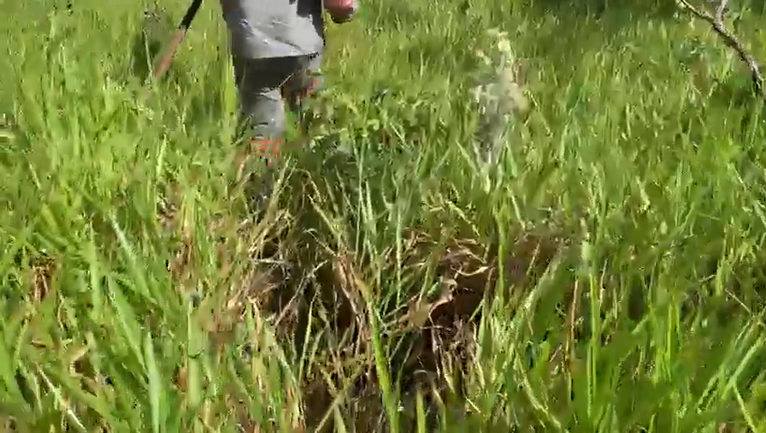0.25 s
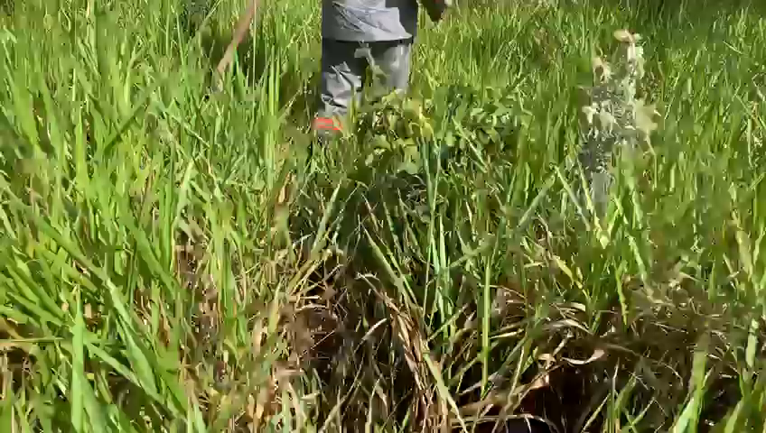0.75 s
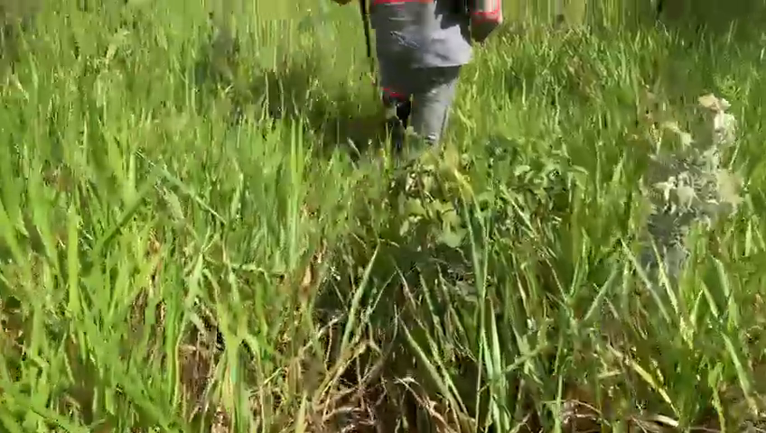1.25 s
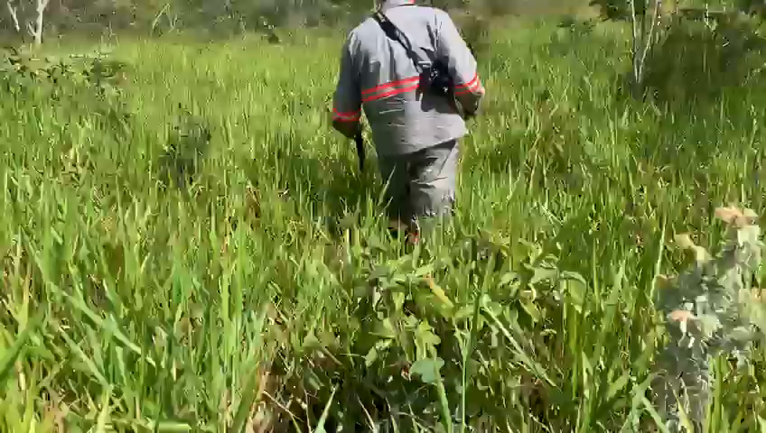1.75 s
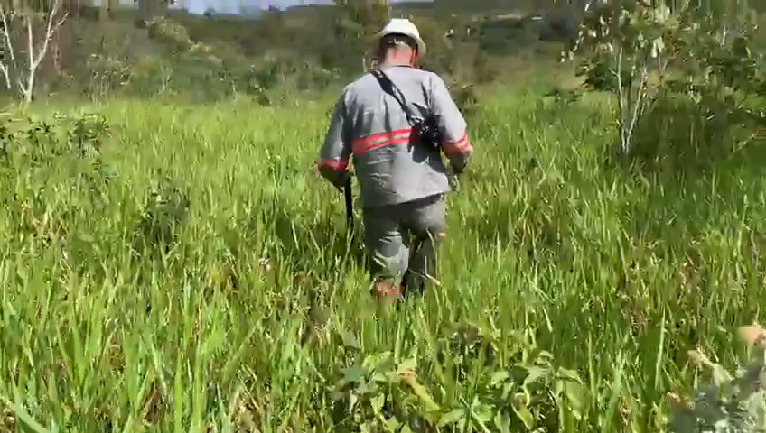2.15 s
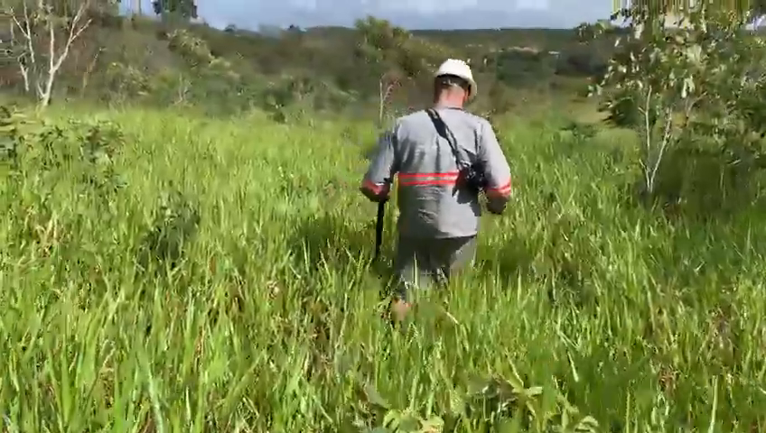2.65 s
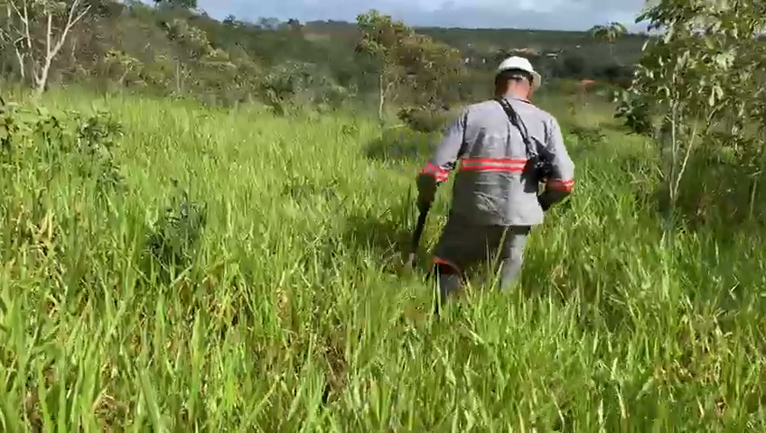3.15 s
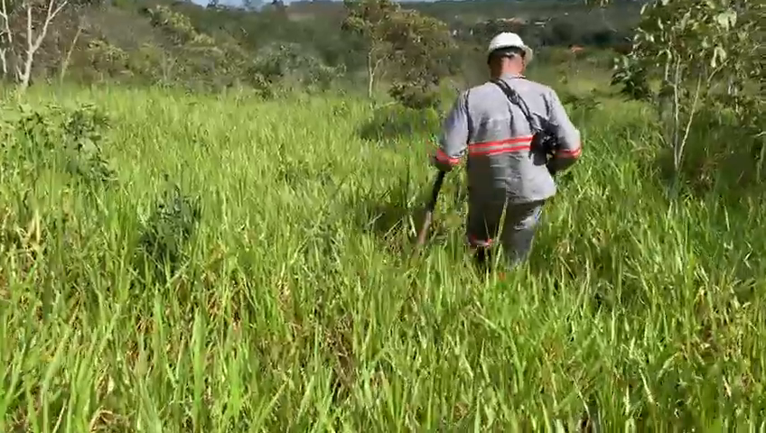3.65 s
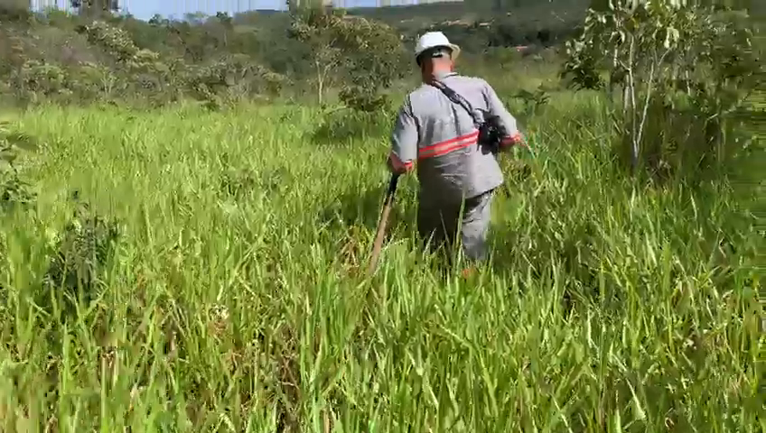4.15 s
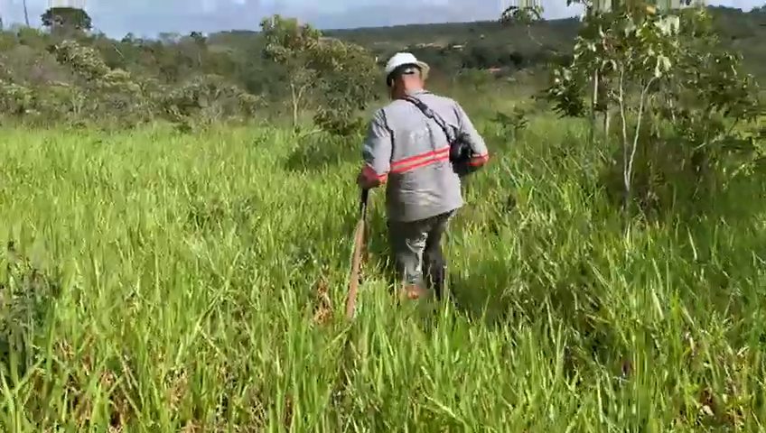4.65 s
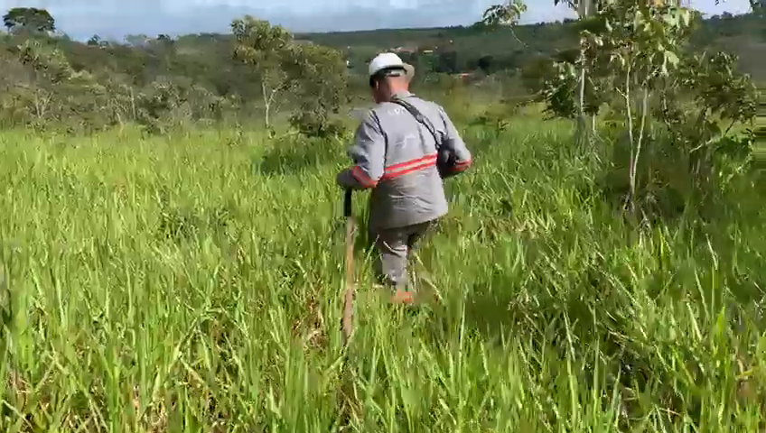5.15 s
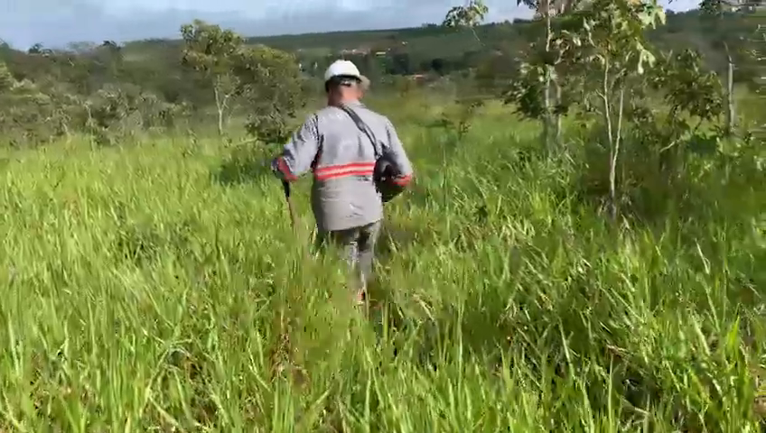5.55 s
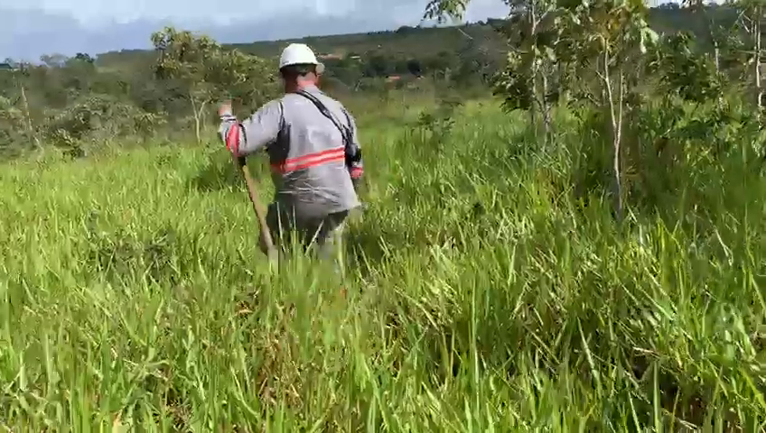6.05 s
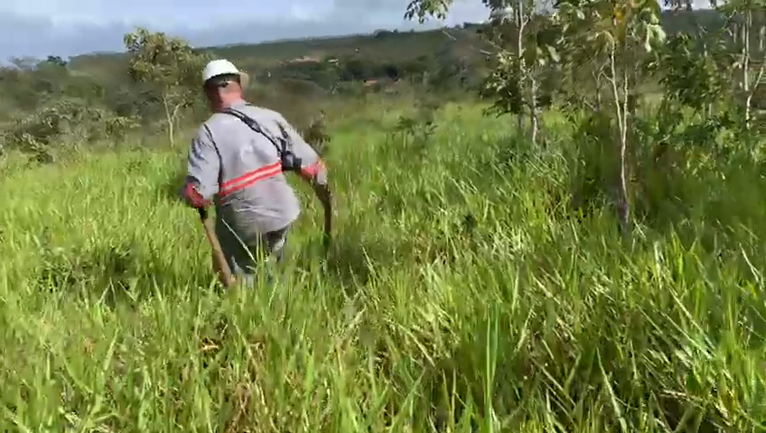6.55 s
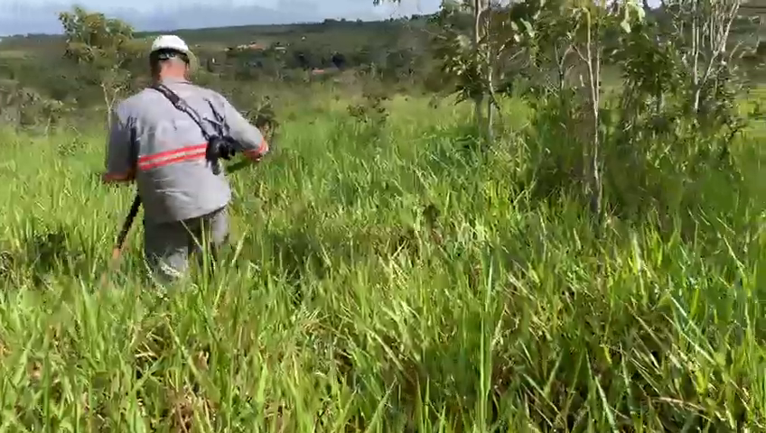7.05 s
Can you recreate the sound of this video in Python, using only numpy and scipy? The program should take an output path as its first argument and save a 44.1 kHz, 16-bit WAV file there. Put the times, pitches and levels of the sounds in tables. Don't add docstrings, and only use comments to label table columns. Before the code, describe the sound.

Close, uneven rasping of grass blades on cloth, dull boot tramples, dry cracks and woody snaps, over soft lumpy wind buffeting outdoors.

```python
import sys
import numpy as np
from scipy import signal
from scipy.fft import rfft, irfft
from scipy.io import wavfile
from scipy.ndimage import uniform_filter1d

SR = 44100
rng = np.random.default_rng(int(sys.argv[2]) if len(sys.argv) > 2 else 0)


def to_wav(s):
    ch = np.atleast_2d(s).T
    pcm = np.round(np.clip(ch, -1, 1) * 32767)
    wavfile.write(sys.argv[1], SR, pcm.astype(np.int16))


def gain_from_decibels(decibels):
    exponent = np.asarray(decibels, float) / 20
    return 10 ** exponent


N = 321930

# pitch_hz [Hz], level_db [dB per Hz]
STEM_COLOUR = [(120, 2), (200, -8.5), (350, -7.5), (650, -13.5), (800, -12), (1050, -8.5), (1400, -9.5),
               (2000, -8.5), (3500, -5), (5800, -0.5)]
# start_s [s], trample_db [dB], crunch_db [dB]
BOOT_LANDINGS = [(.38, -51, -63), (1.05, -53.5, -71), (1.25, -52.5, -49), (1.42, -57, -61),
                 (1.98, -69, -53.5), (2.13, -77, -54), (2.5, -55, -50.5), (3.25, -63, -52.5),
                 (3.9, -65, -69), (4.42, -69, -50.5), (4.7, -74, -59), (4.829, -50.5, -57),
                 (4.94, -53, -50.5), (5.27, -52.5, -42.5), (5.85, -52.5, -50), (6.21, -71, -49.5),
                 (6.361, -53, -50.5), (6.82, -53, -49)]


def curve(hz, table, column=1):
    rows = np.array(table)
    return np.interp(np.log(hz + 1), np.log(rows[:, 0]), rows[:, column])


def colour(x, table, lo_hz, hi_hz):
    hz = np.fft.rfftfreq(N, 1 / SR) + 1
    edges = 1 / np.sqrt((1 + (lo_hz / hz) ** 8) * (1 + (hz / hi_hz) ** 8))
    y = irfft(rfft(x) * gain_from_decibels(curve(hz, table)) * edges, N)
    return y / np.std(y)


def walk(rate_hz):
    hold = int(SR / rate_hz)
    held = np.repeat(rng.standard_normal(N // 200), hold)[:N]
    return 1.7 * uniform_filter1d(uniform_filter1d(held, hold), hold)


def swells(under_db, rows):
    ms = np.arange(N * 1000 // SR + 2)
    power = 0
    for peak_s, peak_db, rise_ms, fade_ms in rows:
        late_ms = ms - 1000 * peak_s
        tens_down = np.where(late_ms < 0, -late_ms / max(rise_ms, 10), late_ms / max(fade_ms, 10))
        power = power + gain_from_decibels(2 * peak_db - 20 * tens_down)
    return 10 * np.log10(gain_from_decibels(2 * under_db) + np.interp(np.arange(N) * 1000 / SR, ms, power))


def ports(pair):
    body = [(80, .87, .1, -.4), (300, .75, -.1, -2.3), (450, .7, -.6, -2.3), (590, .55, -1.6, 0),
            (660, .65, -2.5, 2.5), (720, .5, -1.3, 4.5), (800, .55, -.5, 6.0), (1000, .78, -.4, 2.2),
            (2000, .55, -.45, 1.0), (2300, .3, -2.0, .7), (3000, .58, -2.9, .3), (4200, .05, -3.0, .1),
            (5400, .45, -3.1, -3.0), (5850, .05, -1.5, -3.7), (6400, .8, .05, -.8), (8000, .96, .05, .05)]
    path_from_hz, path_to_hz, path_s = 6130, 10900, .000213
    hz = np.fft.rfftfreq(N, 1 / SR)
    alike = np.clip(curve(hz, body), 0, 1)
    path_hz = np.clip(hz, path_from_hz, path_to_hz) - path_from_hz
    lead = curve(hz, body, column=2) + 2 * np.pi * path_s * path_hz
    tilt = gain_from_decibels(curve(hz, body, column=3) / 2)
    a, b = rfft(pair)
    right = alike * np.exp(1j * lead) * a + np.sqrt(1 - alike ** 2) * b
    return irfft([a * tilt, right / tilt], N)


def widen(x, width_db):
    mid = (x[0] + x[1]) / 2
    side = (x[0] - x[1]) / 2 * gain_from_decibels(width_db)
    return np.array([mid + side, mid - side])


def ticks(spread_db, tail_s, hush_db, flicker_db):
    slips_per_s = 1500
    slips = (rng.random(N) < slips_per_s / SR) * gain_from_decibels(2 * spread_db * rng.exponential(size=N))
    power = signal.lfilter([1], [1, -np.exp(-1 / (tail_s * SR))], slips)
    puff = np.sqrt(power / power.mean() + gain_from_decibels(2 * hush_db)) * gain_from_decibels(flicker_db * walk(25))
    return puff * rng.standard_normal((2, N))


def leg_swings():
    swishes = [(.01, -33, 237, 161), (.25, -37.5, 82, 410), (.38, -27, 210, 202), (0.548, -29, 448, 307),
               (1.09, -38.5, 704, 37), (1.218, -25.5, 107, 306), (1.41, -32.5, 69, 150),
               (1.63, -31, 132, 126), (2.0, -33, 234, 218), (2.409, -31, 205, 672), (2.59, -37.5, 580, 81),
               (2.842, -32, 3, 109.5), (3.3, -35, 299, 189), (3.7, -36.5, 332, 203), (3.8, -38, 35, 850),
               (4.04, -42, 63, 48), (4.16, -35.5, 114, 187), (4.579, -35, 252, 62), (4.9, -32, 91, 144),
               (5.14, -34.5, 780, 134), (5.41, -41, 98, 200), (5.81, -29.5, 116, 428), (6.23, -32, 776, 85),
               (6.601, -39.5, 196, 153), (6.771, -31.5, 65, 754), (6.88, -31.5, 239, 40),
               (.12, -45, 100, 100), (7.06, -33, 236, 600)]
    return swells(-47, swishes) - 4


def follow(hiss_db, below_db, lag):
    return hiss_db + below_db - lag * (hiss_db + 40)


def boot_swells(under_db, column):
    rise_ms, fade_ms = 130, 60
    return swells(under_db, [(b[0], b[column], rise_ms, fade_ms) for b in BOOT_LANDINGS])


def blade_tips(hiss_db):
    tip_colour = [(5000, -8), (6200, -7.5), (6900, -3.5), (7700, -2), (8500, 0), (10800, 0), (11500, -2.5),
                  (11800, -8), (12000, -16)]
    return ports(colour(ticks(1.9, 0.0024, 2.2, 0.97), tip_colour, 5700, 14000) * gain_from_decibels(hiss_db + 3.5))


def blade_rasp(hiss_db, rasp_wide_db, sheen_wide_db):
    slips = ticks(2.5, 0.004, 1.4, 1.3)
    level_db = follow(hiss_db, -9, 0.17)
    rasp_db = level_db - 0.59 * rasp_wide_db - 2.5
    sheen_db = level_db - 0.53 * sheen_wide_db - 0.82
    rasp = colour(slips, STEM_COLOUR, 2300, 3600) * gain_from_decibels(rasp_db)
    sheen = colour(slips, STEM_COLOUR, 3600, 5700) * gain_from_decibels(sheen_db)
    return widen(ports(rasp), rasp_wide_db) + widen(ports(sheen), sheen_wide_db)


def stem_crunch(hiss_db, wide_db):
    level_db = boot_swells(follow(hiss_db, -12, 0.34), column=2) - 0.25 * wide_db + 1.0
    crunch = colour(ticks(2.76, 0.0042, 0.86, 0.92), STEM_COLOUR, 750, 2450) * gain_from_decibels(level_db)
    return widen(ports(crunch), wide_db)


def trample(hiss_db):
    level_db = boot_swells(follow(hiss_db, -17.5, 0.6), column=1) + 2.5
    return ports(colour(ticks(2.9, 0.0071, 3.1, 0.93), STEM_COLOUR, 148, 773) * gain_from_decibels(level_db))


def grass():
    phone_turn = [(0.03, 4.5, 13.5, -4.5), (0.15, 3.5, 11, -2.5), (0.25, 2.5, 4, 3), (0.35, 0, 5.5, 9),
                  (0.45, 9.5, 10.5, -5.5), (0.56, 2.5, 11, -2.5), (0.75, 4, 9.5, -4), (0.82, -2, -9, 7),
                  (0.97, 3, 0, 2), (1.1, -6.5, 2.5, 2), (1.3, -0.5, -2.5, 2.5), (1.6, -6.5, -10.5, 1),
                  (1.8, -0.5, -3.5, 6.5), (1.95, -2, 8, 1.5), (2.12, -3.5, 1.5, 5), (2.35, -4.5, -7.5, 2),
                  (2.55, 4, -7.5, 0.5), (2.73, 3.5, -2.5, 4.5), (2.9, 9, 6, -2.5), (3.1, -0.5, -3.5, 1.5),
                  (3.5, -2.5, -3.0, 0.5), (3.9, -1.5, -7, -2.5), (4.15, -4.5, -2, -1),
                  (4.47, 0.5, -2.5, 3.5), (4.75, -2, -4, -3), (5.0, 2.5, 4, -7.5), (5.25, -5, -7.5, 0.5),
                  (5.4, -6.5, -4, -4), (5.55, 1.5, 8, -1), (5.75, 0, -3, 2.5), (5.93, -2.5, 3.5, 4),
                  (6.15, 0.5, 1.5, 3.5), (6.35, 4, 8.5, -9), (6.53, 4.5, 8, -2.5), (6.66, 1, 0.5, -7.5),
                  (6.83, 4.5, 10.5, 1.5), (7.0, 1, -1, -4.5), (7.15, -3, 2.5, 0), (7.25, 4, 9, -2.5)]
    start_s, *widths = np.transpose(phone_turn)
    t = np.arange(N) / SR
    crunch_wide_db, rasp_wide_db, sheen_wide_db = (np.interp(t, start_s, w) for w in widths)
    hiss_db = leg_swings()
    fine = blade_tips(hiss_db) + blade_rasp(hiss_db, rasp_wide_db, sheen_wide_db)
    return fine + stem_crunch(hiss_db, crunch_wide_db) + trample(hiss_db)


def wind():
    # start_s [s], level_db [dB]
    breeze = [
        (0, -48),
        (.5, -45),
        (1.2, -48.5),
        (2.4, -53),
        (3.2, -52.5),
        (5.6, -52),
        (6.5, -45.5),
        (7.3, -54),
    ]
    # start_s (peak) [s], level_db [dB]
    puffs = [(.04, -42), (.32, -41), (.53, -40.5), (.93, -40.5), (1.3, -49), (1.83, -45), (2.01, -45.5),
             (2.68, -50), (2.86, -42.5), (3.01, -46.5), (3.43, -41.5), (3.53, -47), (3.76, -48.5),
             (4.02, -44), (4.35, -55), (4.57, -46), (4.88, -46), (5.02, -43.5), (5.16, -44.5), (5.49, -50),
             (6.04, -45), (6.69, -42), (6.89, -40.5), (7.08, -47), (1.5, -54), (2.15, -52), (4.2, -51),
             (5.3, -49), (5.9, -46), (6.3, -58.5), (6.5, -42.5), (7.25, -50)]
    # pitch_hz [Hz], level_db [dB per Hz]
    rumble = [(12, -46), (20, -18), (47, -3.5), (70, 3), (89, 1.5), (129, -10), (220, -19.5), (290, -72),
              (480, -120)]
    rise_ms, fade_ms = 77, 67
    breeze_db = np.interp(np.arange(N) / SR, *np.transpose(breeze))
    gust_db = swells(breeze_db, [(*p, rise_ms, fade_ms) for p in puffs])
    lumps = gain_from_decibels(0.88 * walk(11))
    return ports(colour(lumps * rng.standard_normal((2, N)), rumble, 8.6, 195) * gain_from_decibels(gust_db + 0.2))


def blade_whips():
    whips = [(0.0228, -26), (1.1618, -22), (2.1046, -28), (2.378, -25), (2.8404, -27), (3.6726, -28),
             (4.5685, -28), (4.8673, -24), (5.225, -32), (5.4226, -27), (5.915, -22), (6.763, -21),
             (.2324, -26), (1.4496, -25), (2.9317, -33), (4.0053, -32), (4.373, -34), (4.4209, -31),
             (4.6668, -32), (4.7147, -33), (5.3428, -35), (5.6062, -30), (5.8177, -23), (6.352, -34),
             (6.6867, -31), (1.6285, -17.5)]
    out, t = np.zeros((2, N + 2000)), np.arange(600) / SR
    crack = np.sin(2 * np.pi * 9000 * t) * np.exp(-t / .00025)
    stutter = ((0, 6.0), (.0017, 4.0), (.004, .5), (.007, -1.5))
    for start_s, peak_db in whips:
        for lag_s, echo_db in stutter:
            i = int((start_s + lag_s) * SR)
            sign = np.sign(rng.standard_normal())
            out[0, i:i + 600] += sign * gain_from_decibels(peak_db + echo_db) * crack
    return ports(out[:, :N])


def stem_snaps():
    breaks = [(0.047, -40.5, 1160, -0.5), (0.134, -34, 1130, -1), (0.166, -47, 1220, 1.5),
              (0.202, -43, 1190, 2), (0.372, -29, 3450, -1), (0.602, -56, 3800, 3), (1.629, -23, 2830, 0),
              (2.056, -31, 1890, -3), (2.117, -31.5, 1820, 13), (2.785, -44, 3550, -3),
              (2.833, -33.5, 1050, 0), (4.034, -37, 3490, 5), (4.223, -31, 2060, -5),
              (4.396, -30.5, 1900, 0), (4.692, -28, 1600, 5), (4.749, -31.5, 2640, 1.5),
              (5.27, -37, 1530, -7), (5.285, -20, 1980, -3), (5.295, -30, 1310, -2),
              (5.318, -27.5, 1740, -6.5), (6.223, -26.5, 1820, 8), (6.273, -37, 1760, -5),
              (6.5, -35, 1090, 4), (6.972, -27.5, 3850, -1), (0.402, -29, 3970, -2), (1.151, -36, 3710, -6),
              (5.01, -34.5, 4280, -2)]
    out, t = np.zeros((2, N + 2000)), np.arange(600) / SR
    for start_s, peak_db, pitch_hz, pan_db in breaks:
        ring = np.sin(2 * np.pi * pitch_hz * t) * np.exp(-t / 0.00093)
        sides_db = np.array([[pan_db], [-pan_db]]) / 2
        for lag_s, echo_db in ((0, -1), (.0021, -9.5)):
            i = int((start_s + lag_s) * SR)
            out[:, i:i + 600] += gain_from_decibels(peak_db + echo_db + sides_db) * ring
    return out[:, :N]


def thrift(x, table, grid, waver_db, squeezed):
    # start_s [s], coarser_db [dB]
    squeeze = [(0, 2.5), (.2, -1), (.34, 3), (.5, 2), (.74, 3.5), (.8, 0.5), (.9, 4), (1.1, 5),
               (1.18, -0.5), (1.8, -1.5), (1.92, 4), (2.15, 5), (2.3, 2), (2.75, -1.5), (2.9, 0.5),
               (3.05, 1), (4.4, 1.5), (4.52, 4), (4.62, 1.5), (5.4, 2), (5.85, 1.5), (6.0, 0), (6.16, 5),
               (6.3, 1.5), (6.82, 2), (6.92, -0.5), (7.15, 0.5), (7.25, 1)]
    squeeze_from_hz, squeeze_to_hz = 2000, 5800
    hop, starved_db = 1024, 10.5
    n, k = np.arange(2 * hop), np.arange(564)
    window = signal.windows.kaiser_bessel_derived(2 * hop, 4 * np.pi)
    waves = np.cos(np.pi / hop * np.outer(n + .5 + hop / 2, k + .5))
    basis = window[:, None] * waves * np.sqrt(2 / hop)
    lead = hop - grid
    padded = np.pad([x[0] + x[1], x[0] - x[1]], ((0, 0), (lead, 2 * hop - (lead + N) % hop)))
    blocks = padded.reshape(2, -1, hop)
    lines = np.concatenate([blocks[:, :-1], blocks[:, 1:]], axis=2) @ basis

    edges = np.r_[0:96:8, 96:564:12]
    widths = np.diff(edges, append=len(k))
    level = np.sqrt(np.add.reduceat(lines ** 2, edges, axis=2) / widths) + 1e-9
    hz = (edges + widths / 2) * SR / 2 / hop

    waver = uniform_filter1d(rng.standard_normal(level.shape), 3, axis=1)
    top = level.max(axis=0) * gain_from_decibels(waver_db * waver)
    starve_db = curve(hz, table, column=2)
    keep = (level > top * gain_from_decibels(starve_db)) | (level == level.max(axis=0))
    frame_s = (np.arange(level.shape[1]) * hop + grid) / SR
    middle = (hz > squeeze_from_hz) & (hz < squeeze_to_hz)
    squeeze_db = squeezed * np.outer(np.interp(frame_s, *np.transpose(squeeze)), middle)
    kept_step_db = curve(hz, table) + squeeze_db
    step_db = np.where(keep, kept_step_db, starve_db + starved_db + 0.37 * squeeze_db)
    step = np.repeat(top * gain_from_decibels(step_db), widths, axis=2)
    rounded = np.floor((abs(lines) / step) ** .75 + .4054) ** (4 / 3) * step

    frames = (np.sign(lines) * rounded) @ basis.T
    first_half = np.pad(frames[:, :, :hop], ((0, 0), (0, 1), (0, 0)))
    second_half = np.pad(frames[:, :, hop:], ((0, 0), (1, 0), (0, 0)))
    total, diff = (first_half + second_half).reshape(2, -1)[:, lead:lead + N]
    return np.array([total + diff, total - diff]) / 2


def scene():
    return grass() + wind() + blade_whips() + stem_snaps()


def roll_off(x):
    return signal.sosfilt(signal.butter(12, 12930, fs=SR, output="sos"), x)


def record(dry):
    # pitch_hz [Hz], step_db (rounding), starve_db (weaker of sum and difference) [dB re stronger]
    first_pass = [(200, -30, -30), (800, -18, -20), (1200, -11, -12), (1550, -5, -9), (2100, 2, -6),
                  (3300, 3, -5.5), (4600, 2.5, -5.5), (5700, 0, -5), (6500, -3, -5), (7300, 1.5, -2.5),
                  (7800, -4, -2), (9000, -4, -2.5), (9500, 2, -1.5), (9900, -1, -4.5), (10700, -5, -6),
                  (11400, -4, -10.5), (11760, 8, -5), (12020, 14, -5)]
    later_pass = [(200, -24, -30), (800, -15, -22), (1200, -11, -15), (1550, -5.5, -13), (2100, 0, -11),
                  (3000, -1.5, -8.5), (3500, -1, -9), (4600, -2.5, -11), (5700, -6, -11), (7300, -6.5, -9),
                  (7800, -9, -7), (9100, -10, -7), (10500, -11, -10), (11400, -8, -14), (12020, 4, -10)]
    first = thrift(dry, first_pass, grid=700, waver_db=3.5, squeezed=1)
    mix = thrift(first, later_pass, grid=191, waver_db=2, squeezed=0)
    return roll_off(mix)


dry = scene()
out = record(dry)
to_wav(out)
```